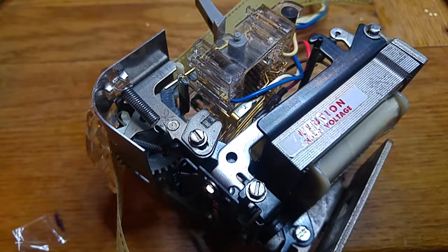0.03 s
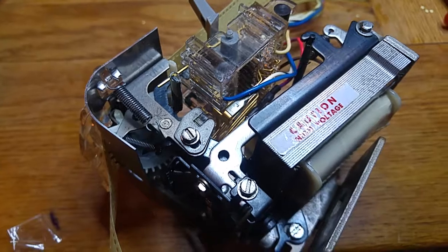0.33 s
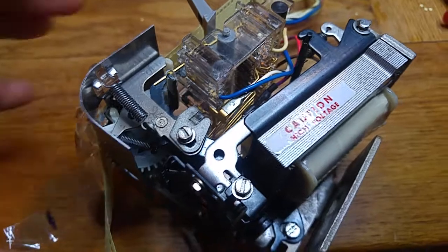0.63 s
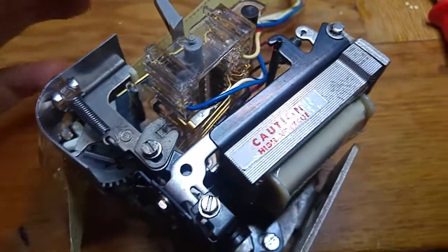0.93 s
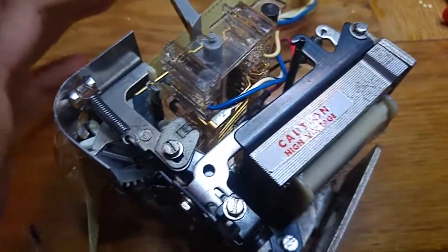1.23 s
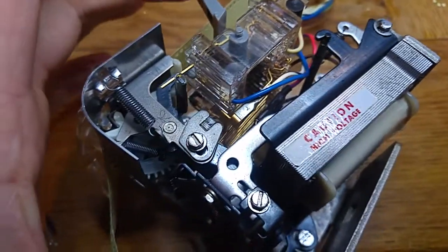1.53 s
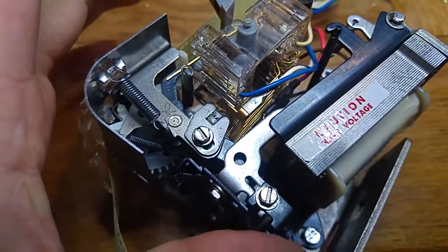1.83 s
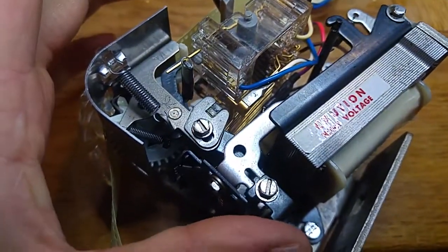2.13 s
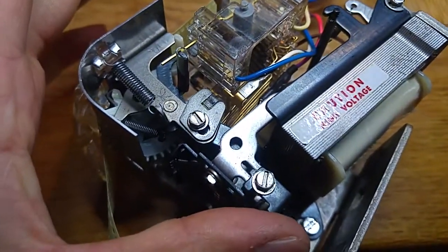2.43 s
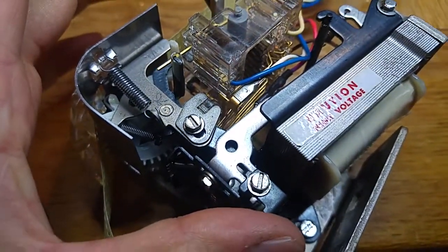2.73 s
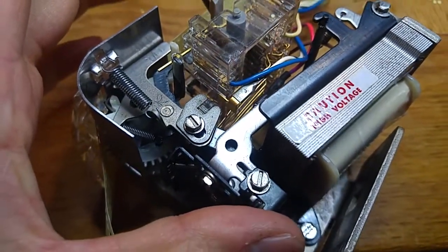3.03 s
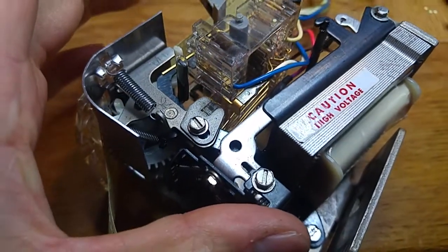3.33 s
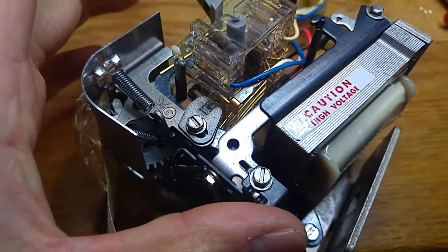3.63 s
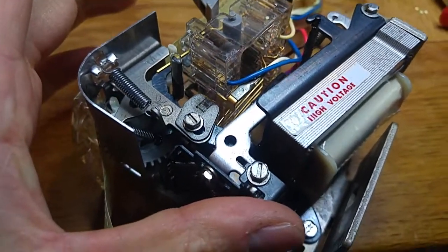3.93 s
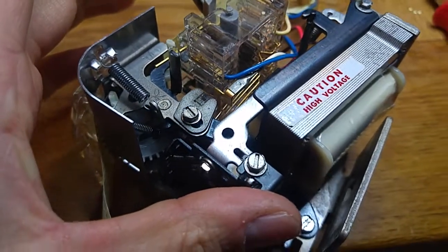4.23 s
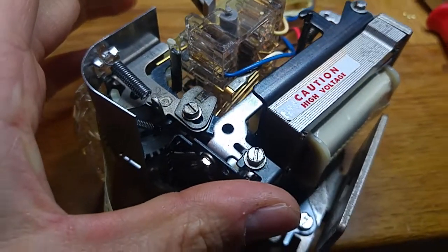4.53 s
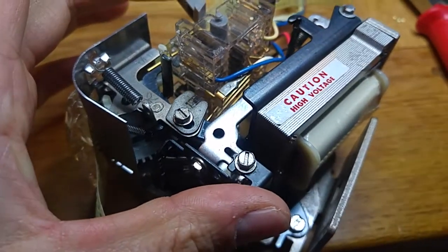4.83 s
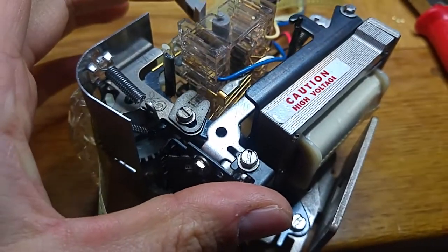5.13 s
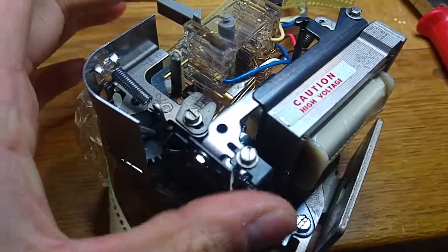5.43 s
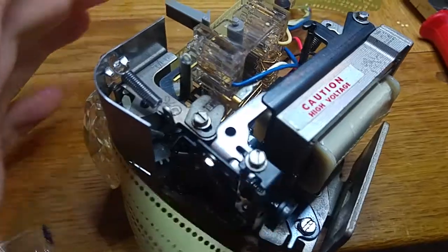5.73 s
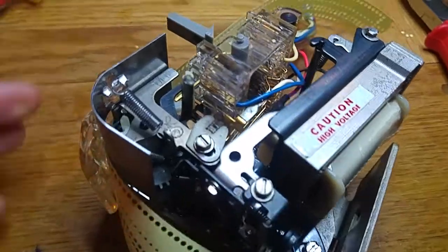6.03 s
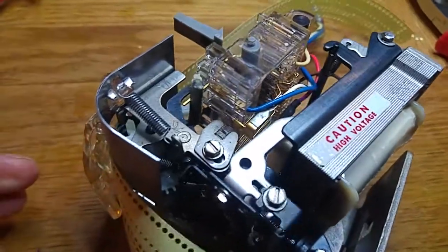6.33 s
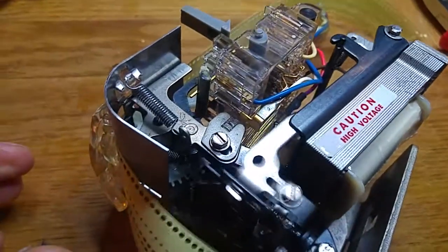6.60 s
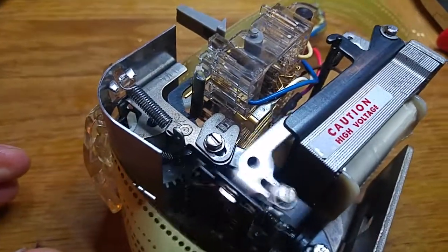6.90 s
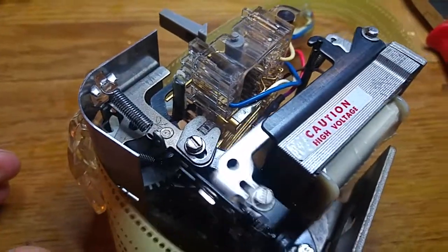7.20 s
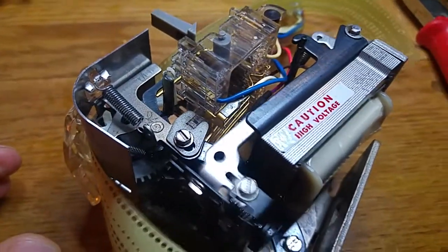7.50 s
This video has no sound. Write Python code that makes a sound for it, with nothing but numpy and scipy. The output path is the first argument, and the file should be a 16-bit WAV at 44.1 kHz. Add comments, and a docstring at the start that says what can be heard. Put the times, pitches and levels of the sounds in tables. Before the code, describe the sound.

A paper tape reader on a wooden table hums and whirrs softly, heard up close indoors. Some five seconds in, its clutch snaps and the mechanism breaks into a loud, rapid, regular clatter of clicking steel parts, knocking levers and a rattling, ringing chassis. The clatter runs on to the end, with a short high squeal of rubbing metal shortly before it finishes.

```python
"""A small room, close to a mechanical paper tape reader on a wooden table.
Its mains motor idles with a hum and a whirr of gears; then a lever trips the clutch and a cam steps
the tape ten times a second. Each impact excites the damped modes of the part it strikes: the pawl snaps,
the sensing pins click, levers knock, the table thuds and the chassis rings. Loose parts rattle,
and friction makes a steel part sing for a moment."""
import sys
import numpy as np
from scipy import signal
from scipy.fft import rfft, irfft, next_fast_len
from scipy.io import wavfile

SR = 44100
rng = np.random.default_rng(int(sys.argv[2]) if len(sys.argv) > 2 else 0)


def pcm_store(signal):
    """Save signal as 16-bit PCM."""
    levels = np.round(np.clip(np.atleast_2d(signal), -1, 1) * 32767)
    wavfile.write(sys.argv[1], SR, levels.astype(np.int16).T)


N = 337806
TIME = np.arange(N) / SR
FIRST_STEP_S, TURN_S, TURNS = 5.3873, .10017, 23   # the cam turns steadily, one tape step a turn
STEP_TIMES = FIRST_STEP_S + TURN_S * np.arange(TURNS)
# impacts as the clutch lever is tripped and the drive takes hold: (t/s, level/dB, t60/s)
CLUTCH_BLOWS = [(5.2858, -24, 0.011), (5.296, -23, .05), (5.3034, -4, 0.027), (5.306, -3, 0.022),
                (5.3109, -12, 0.0068), (5.3195, -19, .03), (5.4097, -6.5, 0.028), (5.4165, -17, 0.021)]


def pawl(snap_db=14.5, chatter_db=-4, t60=0.0098):
    """Impact excitation: a hard first touch and its chatter drive the resonances of the feed pawl."""
    # force of the pawl, easing in mid-run: (t/s, level/dB)
    force_curve = [(5.39, -5.5), (5.69, -6), (6.19, -9.5), (6.39, -11.5), (6.69, -14.5), (6.95, -8.5),
                   (7.28, -16), (7.39, -7), (7.6, -8)]
    # resonances of the pawl: (f/Hz, bandwidth/Hz, level/dB)
    resonances = [(3300, 360, -13), (4640, 370, -4.5), (6570, 370, 2), (7400, 280, -4), (9300, 200, -1.5),
                  (10370, 260, -6.5), (13100, 700, -8.5)]
    force_db, = in_time(force_curve, STEP_TIMES)
    snap = np.bincount((STEP_TIMES * SR).astype(int), from_db(force_db + snap_db), N)
    spray = chatter([(s, db + chatter_db, t60) for s, db in zip(STEP_TIMES, force_db)])
    return resonate(snap + spray, resonances)


def pins_and_clutch(pin_t60=.012, clutch_db=-2):
    """Brief steel contacts have a broad spectrum, so they excite the high resonances of small parts."""
    # clicks of pins and springs in each turn: (t/s after the pawl, level/dB)
    clicks = [(.0028, -11.5), (.0056, -13), (.0071, -15), (.012, -15.5), (.0145, -15), (.0245, -28),
              (.0338, -13), (.059, -25), (.0705, -22), (.084, -21)]
    # resonances of the small steel parts: (f/Hz, bandwidth/Hz, level/dB)
    resonances = [(3140, 420, -4), (5620, 580, -2), (7150, 910, 1.5), (7500, 930, -4), (8570, 220, 1),
                  (10040, 940, -7), (11350, 480, -3), (12400, 1900, -2), (15000, 3100, -3.5)]
    pins = chatter([(s, db, pin_t60) for s, db in every_turn(clicks, jitter_s=0.00027, uneven_db=1.5)])
    clutch = chatter([(s, db + clutch_db, t60) for s, db, t60 in CLUTCH_BLOWS])
    return resonate(pins + clutch, resonances)


def levers(frame_db=-1, clutch_knock_db=-17):
    """Levers knock on frame and stop; a soft contact puts little energy into the treble."""
    # the feed lever strikes the frame: (t/s after the pawl, level/dB)
    feed_knocks = [(.0118, -9.5), (.016, -14.5), (.0245, -20.5), (.0295, -18), (.070, -25)]
    # modes of the frame: (f/Hz, level/dB, t60/s)
    frame_modes = [(650, -10, 0.011), (830, -15.5, 0.039), (900, -20, 0.0097), (960, -7.5, 0.035),
                   (973, -8.5, 0.029), (1095, -27, 0.012)]
    # the pin lever falls back on its stop: (t/s after the pawl, level/dB)
    returns = [(.0195, -13.5), (.032, -13.5), (.044, -27.5), (.080, -23.5)]
    # duller modes of the pin lever: (f/Hz, level/dB, t60/s)
    lever_modes = [(486, -11, .022), (560, -10, .02), (750, -8.5, .014), (850, -4, 0.02)]
    clutch_knocks = [(CLUTCH_BLOWS[k][0], clutch_knock_db) for k in (2, 4)]
    knocks = np.vstack([clutch_knocks, every_turn(feed_knocks, jitter_s=0.00016, uneven_db=0.0)])
    frame = from_db(frame_db) * struck(knocks, frame_modes, uneven_db=1.0)
    lever = struck(every_turn(returns, jitter_s=0.00019, uneven_db=0.5), lever_modes, uneven_db=2.0)
    return butterworth(frame + lever, 2, [450, 1500], "band")


def table(level_db=-1):
    """Structure-borne sound: the chassis thuds on the wooden table, whose low modes radiate."""
    # thuds in each turn: (t/s after the pawl, level/dB)
    thuds = [(.0125, -16), (.0255, -12.5), (.0325, -14.5), (.043, -10.5), (.054, -15.5), (.066, -23),
             (.081, -20)]
    # modes of the table: (f/Hz, level/dB, t60/s)
    modes = [(129, -26, 0.05), (158, -18, 0.038), (262, -7.5, 0.023), (322, -13.5, 0.03),
             (368, -16.5, 0.024), (512, -11, 0.031)]
    wood = struck(every_turn(thuds, jitter_s=0.00018, uneven_db=0.5), modes, uneven_db=1.5)
    return from_db(level_db) * slack(start_db=-5) * butterworth(wood, 4, 105, "high")


def cover_plate():
    """Bending modes of the light cover plate ring under taps that vary from turn to turn."""
    # taps in each turn: (t/s after the pawl, level/dB)
    taps = [(.0005, -22), (.0245, -19), (.0275, -20.5), (.033, -24), (.0542, -18), (.070, -23)]
    # modes of the plate: (f/Hz, level/dB, t60/s)
    modes = [(1490, -9.5, 0.0089), (1550, -7, 0.011), (2016, -12.5, 0.033), (2100, -15.5, 0.024),
             (2396, -7.5, 0.024), (2560, -32, 0.0059), (2830, -8.5, 0.011), (3390, -13, 0.014)]
    blows = every_turn(taps, jitter_s=.0003, uneven_db=3.5)
    return slack(start_db=-5) * struck(blows, modes, uneven_db=3.0)


def rattle(level_db=-22, grain_db=0.5, grains_per_s=16000, flutter_db=0.5):
    """Shot noise: dense tiny collisions of loose parts and tape follow the load on the cam."""
    # spectrum of the collisions: (f/Hz, relative level/dB)
    spectrum = [(130, -3), (350, -1.5), (800, 1.5), (1300, -4), (1900, 1.5), (2400, 4.5), (3000, -6),
                (4200, -8.5), (7200, -1), (7800, -8), (8500, -4), (10700, -11), (12600, -8.5),
                (15500, -8.5)]
    # rattle due to the load through one turn: (t/s after the pawl, level/dB)
    load_curve = [(0, 2.5), (.015, 2), (.026, 0.5), (.034, 3.5), (.046, -1.5), (.06, 0), (.078, -1.5),
                  (.1, 2)]
    since_step = np.maximum(TIME - FIRST_STEP_S, 0) % TURN_S
    load_db, = in_time(load_curve, since_step)
    collisions = rng.random(N) < grains_per_s / SR
    grains = collisions * rng.standard_normal(N) * from_db(grain_db * drift(700))
    engaged = from_db(np.interp(TIME, [5.37, 5.45], [-5, 0])) * (TIME > CLUTCH_BLOWS[2][0])
    return engaged * from_db(level_db + load_db + flutter_db * drift(120)) * coloured(grains, spectrum)


def chassis(level_db=-1, contact_hz=1200):
    """Lightly damped chassis modes ring on from turn to turn, which gives the clatter its pitch."""
    # modes, each excited by one heavy blow a turn: (f/Hz, level/dB, t60/s, t/s after the pawl)
    modes = [(69, -42, 0.57, 0.01), (118.7, -28.5, 0.25, 0.0122), (140, -30, 0.44, 0.0129),
             (184.6, -26.5, 0.43, 0.01275), (200.2, -28, 0.24, 0.0302), (247.7, -27.5, 0.3, 0.021),
             (278, -27.5, 0.45, 0.026), (327, -28.5, 0.38, .0325), (480, -27.5, 0.19, 0.029),
             (516, -32, 0.24, .0325), (530, -37, 0.49, .0245), (654, -25.5, 0.28, 0.0089),
             (769, -25, 0.31, .0195), (861, -24.5, 0.26, 0.029), (956, -25.5, 0.36, .0118),
             (1058, -24, 0.21, 0.027)]
    rings = 0
    for hz, db, t60, delay in modes:
        blows = every_turn([(delay, level_db)], jitter_s=.00005, uneven_db=0.2)
        rings += struck(blows, [(hz, db, t60)], uneven_db=1.33)
    return slack(start_db=-6) * butterworth(rings, 3, [70, contact_hz], "band")


def squeal(waver_db=2.0, waver_rad=0.26):
    """Friction-driven vibration: rubbing keeps a steel part ringing, unsteadily."""
    # envelope of the squeal: (t/s, level/dB)
    envelope = [(5.4, -69), (6.0, -49), (6.87, -50), (6.9, -32), (7.05, -24.5), (7.24, -28.5), (7.34, -46),
                (7.45, -34), (7.66, -35)]
    # partials of the rubbed part: (f/Hz, relative level/dB)
    partials = [(3268, -14.5), (5895, -3), (6406, -19), (9039, -14), (12699, -14)]
    level_db, = in_time(envelope)
    tones = 0
    for hz, db in partials:
        amplitude = from_db(db + waver_db * drift(40))
        tones += amplitude * np.sin(2 * np.pi * hz * TIME + waver_rad * drift(30))
    return np.sqrt(2) * from_db(level_db) * tones * (TIME > FIRST_STEP_S)


def motor_hum(waver_rad=0.19):
    """Periodic magnetic forces make the motor hum at harmonics of the mains frequency."""
    # mains harmonics, a tone at 279 Hz and a gear tone: (f/Hz, rms level/dB)
    partials = [(50, -68), (100, -42.5), (150, -61), (200, -45.5), (279, -51.5), (350, -52), (400, -49),
                (1400, -46.5)]
    hum = 0
    for hz, db in partials:
        phase = 2 * np.pi * (hz * TIME + rng.random()) + waver_rad * drift(6)
        hum += from_db(db) * np.sqrt(2) * np.sin(phase)
    return hum


def gears_and_bearing(mains_hz=50, whirr_db=-36, throb=0.076, buzz_db=-49, tick_decay_s=0.0018):
    """Amplitude modulation: the field pulls twice a mains cycle, so gears throb and a bearing ticks."""
    # spectrum of the whirr: (f/Hz, relative level/dB)
    spectrum = [(45, -24), (90, -14), (125, -2), (170, -9), (240, -1), (330, -2.5), (530, -9), (680, -0.5),
                (860, 0), (1450, -9), (1800, -8), (2350, -10), (3500, -19.5), (4300, -26.5), (9000, -35.5),
                (14000, -39)]
    # resonances of the bearing: (f/Hz, bandwidth/Hz, level/dB)
    resonances = [(4830, 250, -4), (5290, 67, 0.5), (5660, 230, 0), (6280, 400, 1), (6715, 230, 3),
                  (7550, 210, -4.5), (8050, 140, -6), (8940, 1100, -11.5), (11250, 230, -12),
                  (12300, 450, -13), (13400, 350, -13), (14600, 1000, -15)]
    since_pull = (TIME - .0058) % (1 / (2 * mains_hz))
    pull = np.cos(2 * np.pi * 2 * mains_hz * since_pull)
    whirr = coloured(rng.standard_normal(N), spectrum) * (1 + throb * pull)
    contact = 0.37 + np.exp(-since_pull / tick_decay_s)   # steady rubbing plus a tick at each pull
    ticks = rms_one(rng.standard_normal(N) * contact)
    return from_db(whirr_db) * whirr + from_db(buzz_db) * resonate(ticks, resonances)


def housing(level_db=-42.5, swell_db=3.5, waver_rad=0.85, roughness=0.64):
    """Forced resonance: a gear tone and the gears' roughness drive the motor housing."""
    # resonance of the housing: (f/Hz, bandwidth/Hz, level/dB)
    resonance = [(848, 180, 0)]
    waver = waver_rad * (drift(40) + 2 * drift(8))
    tone = np.sqrt(2) * np.sin(2 * np.pi * resonance[0][0] * TIME + waver)
    rough = rms_one(resonate(resonate(rng.standard_normal(N), resonance), resonance))
    swell = from_db(level_db + swell_db * 2 * np.tanh(drift(15) / 2))
    return swell * rms_one(tone + roughness * rough)


def room(x, t60, wet_db):
    """Reverberation: reflections from table and walls follow a short gap and decay exponentially."""
    age = TIME[:SR // 2]
    tail = rng.standard_normal(len(age)) * from_db(-60 * age / t60) * (age > .003)
    return x + from_db(wet_db) * signal.fftconvolve(x, tail / np.linalg.norm(tail))[:N]


def every_turn(contacts, jitter_s, uneven_db):
    """Nearly periodic forcing: the cam repeats its contacts (t/s, level/dB) with slight scatter."""
    blows = np.array([(s + delay, db) for s in STEP_TIMES for delay, db in contacts])
    return blows + rng.standard_normal(blows.shape) * [jitter_s, uneven_db]


def slack(start_db):
    """Backlash: the first turn is softer while the drive takes up its slack."""
    return from_db(np.interp(TIME, [5.42, 5.52], [start_db, 0]))


def struck(blows, modes, uneven_db):
    """Modal superposition: each blow rings every damped mode with a strength of its own."""
    onsets, out = np.round(blows[:, 0] * SR).astype(int), np.zeros(N)
    for hz, db, t60 in modes:
        force = from_db(blows[:, 1] + db + uneven_db * rng.standard_normal(len(onsets)))
        impulses = np.bincount(onsets, force, N)[:N]
        r, w = from_db(-60 / (t60 * SR)), 2 * np.pi * hz / SR
        out += signal.lfilter([1, -r * np.cos(w)], [1, -2 * r * np.cos(w), r * r], impulses + 1e-18)
    return out


def chatter(blows):
    """Incoherent sum: each blow (t/s, level/dB, t60/s) is a dying spray of micro-impacts; powers add."""
    power, age = np.zeros(2 * N), TIME[:SR // 10]
    for s, db, t60 in blows:
        power[int(s * SR):][:len(age)] += from_db(db - 60 * age / t60) ** 2
    return np.sqrt(power[:N]) * rng.standard_normal(N)


def resonate(x, resonances):
    """Parallel resonators of alternating sign, scaled so that white noise about keeps its level."""
    out, power = 0, 0
    for k, (hz, width, db) in enumerate(resonances):
        r = np.exp(-np.pi * width / SR)
        gain = (1 - r * r) / 2
        feedback = [1, -2 * r * np.cos(2 * np.pi * hz / SR), r * r]
        out += (-1) ** k * from_db(db) * signal.lfilter([gain, 0, -gain], feedback, x + 1e-18)
        power += gain * from_db(db) ** 2
    return out / np.sqrt(power)


def coloured(x, spectrum):
    """Spectral shaping by a curve (f/Hz, level/dB), rolled off below its first point; rms 1."""
    hz, db = np.transpose(spectrum)
    size = next_fast_len(N)
    f = np.maximum(np.fft.rfftfreq(size, 1 / SR), 1)
    gain = from_db(np.interp(np.log(f), np.log(hz), db)) * np.minimum(f / hz[0], 1) ** 2
    return rms_one(irfft(rfft(x, size) * gain, size)[:N])


def drift(knots_per_s):
    """Random fluctuation of rms 1."""
    knots = rng.standard_normal(int(N / SR * knots_per_s) + 2)
    return rms_one(np.interp(TIME * knots_per_s, np.arange(len(knots)), knots))


def in_time(rows, t=TIME):
    """Linear interpolation of a curve's columns in time."""
    s, *columns = np.transpose(rows)
    return [np.interp(t, s, c) for c in columns]


def butterworth(x, order, hz, kind):
    return signal.sosfilt(signal.butter(order, hz, kind, fs=SR, output="sos"), x)


def from_db(db):
    return 10 ** (np.asarray(db) / 20)


def rms_one(x):
    return x / np.sqrt(np.mean(x ** 2) + 1e-20)


def scene():
    """Superposition: the cam's clatter sounds into the room over the steadily running motor."""
    impacts = pawl() + pins_and_clutch() + levers() + table() + cover_plate() + rattle()
    clatter = room(impacts, t60=0.11, wet_db=-23.0)
    motor = motor_hum() + gears_and_bearing() + housing()
    return (clatter + chassis() + squeal() + motor)[None]


def record(dry, cutoff_hz=15750):
    """The sound fades in from silence; soft saturation rounds the peaks and a low-pass cuts the top."""
    fade = np.interp(TIME, [.604, .606, .86], [0, .06, 1])
    rounded = 1.28 * np.tanh(dry * fade / 1.023)
    return signal.sosfilt(signal.ellip(10, .1, 70, cutoff_hz, fs=SR, output="sos"), rounded)


dry = scene()
out = record(dry)
pcm_store(out)
```